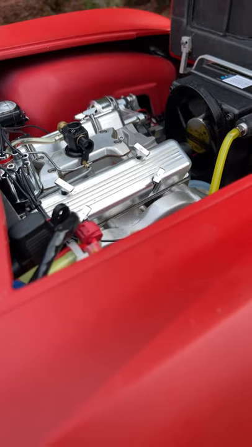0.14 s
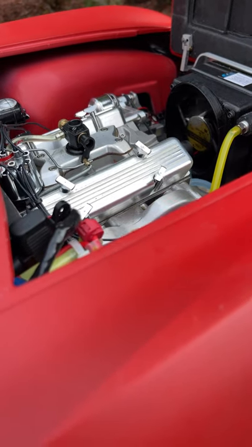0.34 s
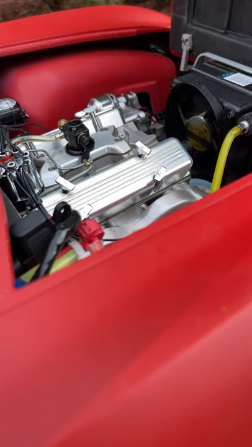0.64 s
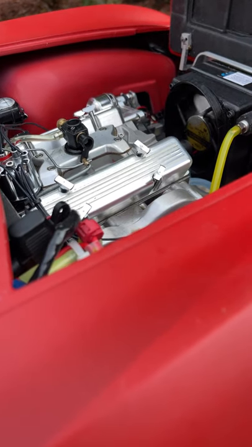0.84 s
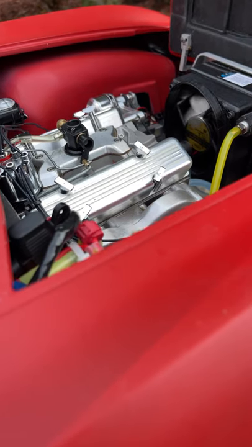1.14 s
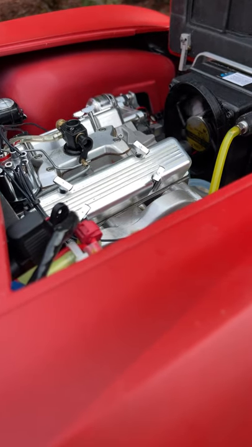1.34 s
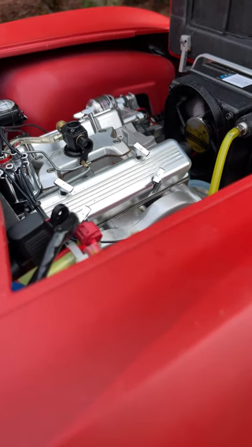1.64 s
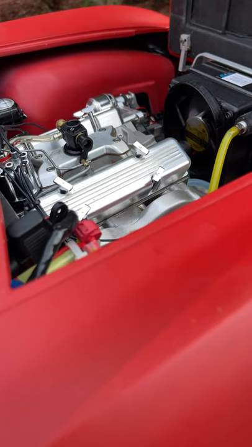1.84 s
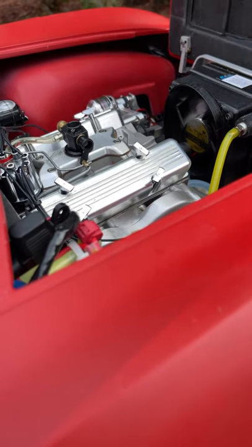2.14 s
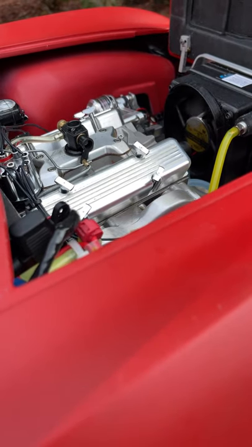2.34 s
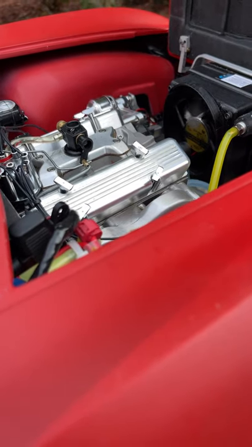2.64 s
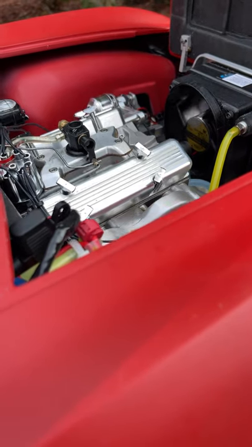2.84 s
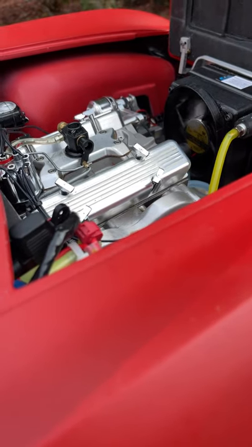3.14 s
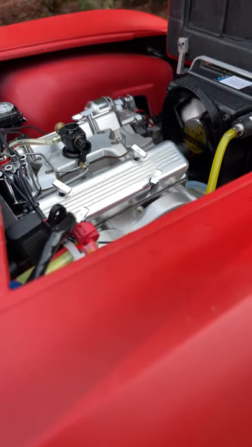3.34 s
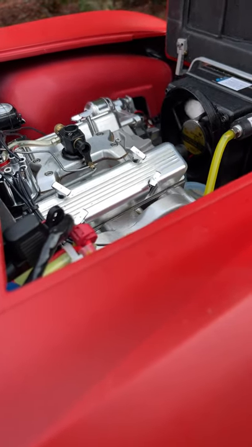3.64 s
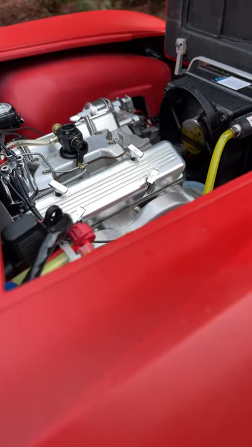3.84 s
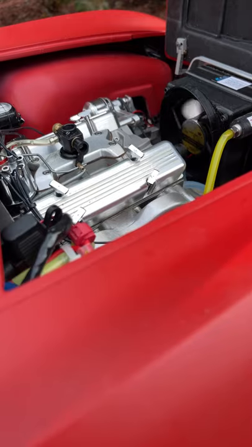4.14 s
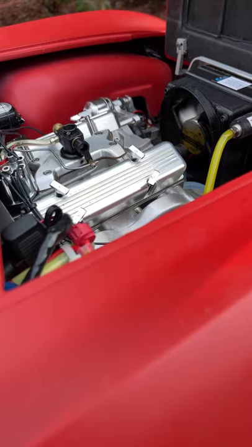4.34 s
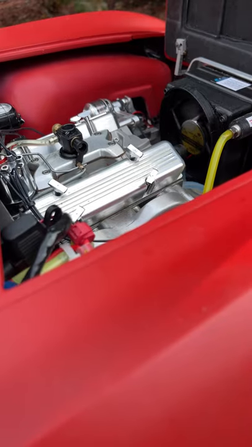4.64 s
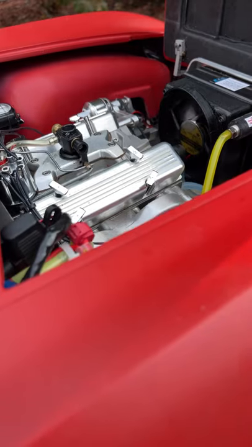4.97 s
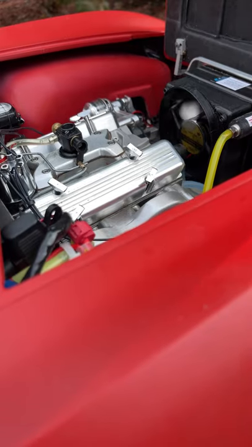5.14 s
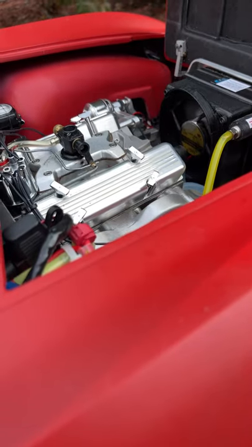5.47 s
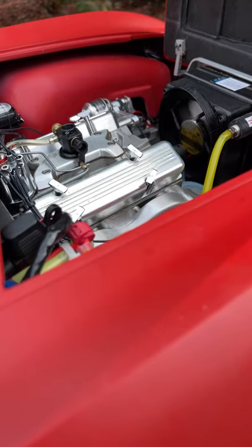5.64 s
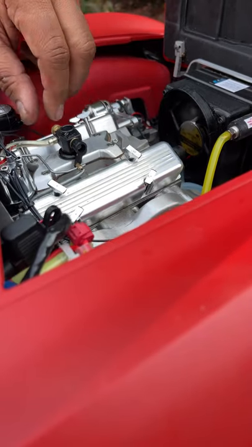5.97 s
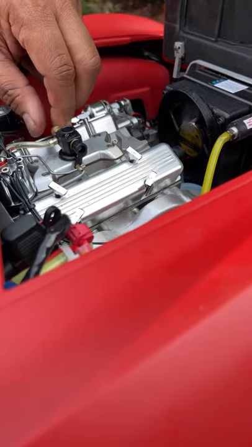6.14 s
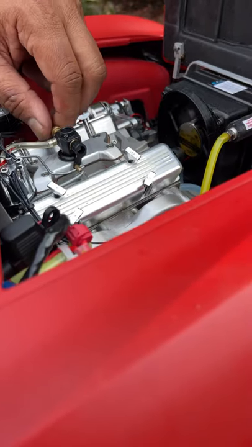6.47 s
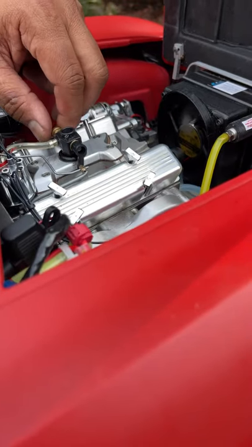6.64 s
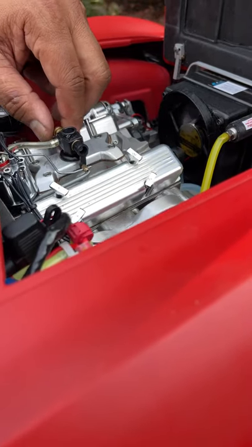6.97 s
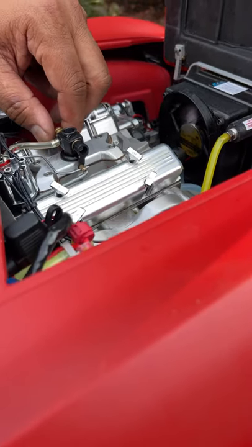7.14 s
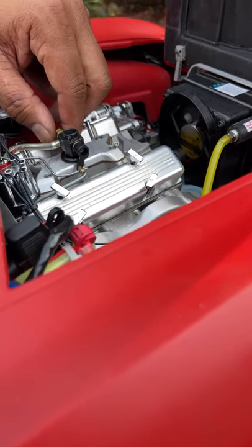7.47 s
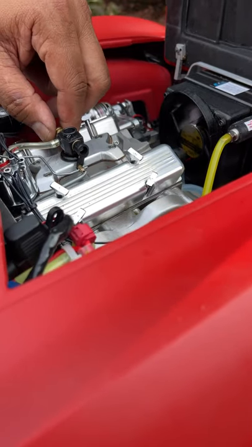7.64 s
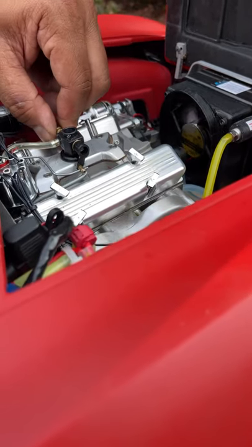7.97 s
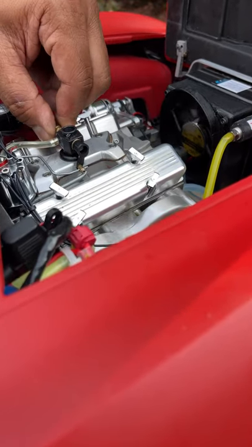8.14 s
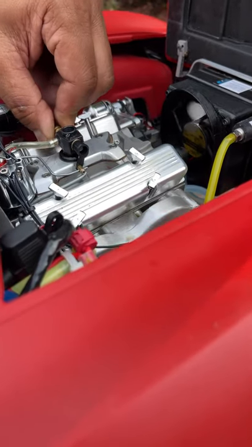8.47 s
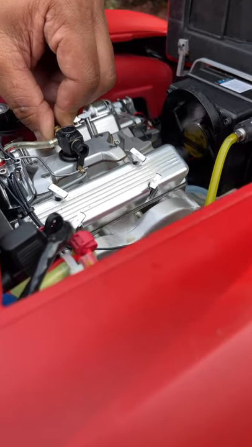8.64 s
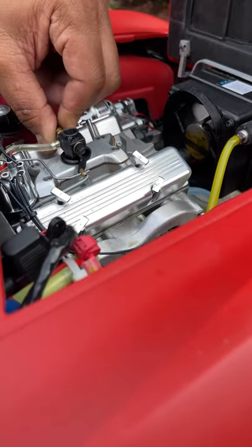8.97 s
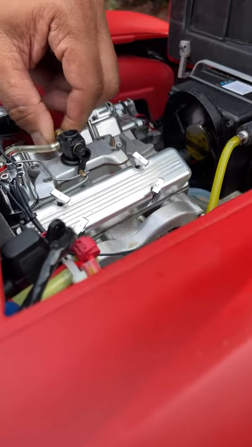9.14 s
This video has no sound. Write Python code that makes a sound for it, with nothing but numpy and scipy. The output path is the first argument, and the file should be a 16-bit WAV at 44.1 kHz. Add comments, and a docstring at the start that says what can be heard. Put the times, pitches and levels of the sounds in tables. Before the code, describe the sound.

Near-silent outdoor air, then a sharp clack and a bright, steady grinding of small starter gears, lasting over two seconds with a faint motor hum. After that come short throbbing bites with rough growls and tooth scrapes, with soft chuffing between. A last rattling bite comes near seven seconds, then only quiet chuffing. Close, dry microphone with dulled top.

```python
"""A starter clacks in, grinds for about two and a half seconds, then bites in short throbbing bursts.
Between bites the engine turns with a soft chuffing and now and then a graze of teeth; it never settles into running.
Place: the open engine bay of a model car with a miniature V8, outdoors. Distance: no loss or echo is added.
Gears, scrapes, clack and air are random noise or impacts filtered by the bay; motor, squeaks and thumps are sines.
The microphone rounds the peaks, has a deep notch in the treble and loses the top."""
import sys
import numpy as np
from scipy import signal
from scipy.fft import rfft, irfft
from scipy.io import wavfile
from scipy.ndimage import uniform_filter1d

SR = 44100
rng = np.random.default_rng(int(sys.argv[2]) if len(sys.argv) > 2 else 0)


def put_to_file(sound):
    """Save the sound as 16-bit audio at rate SR, in the file named by the first command-line argument."""
    columns = np.atleast_2d(sound).T  # one column per channel
    safe = np.clip(columns, -1, 1)
    whole_steps = np.round(safe * 32767)
    wavfile.write(sys.argv[1], SR, whole_steps.astype(np.int16))


N = 410130
TIME = np.arange(N) / SR

# Levels below are before the trims in the functions; spectra are relative, as colour() evens out their power.
# crankshaft, steady at first and then surging and sagging: (time [s], speed [turns/s])
CRANK_SPEED = [(0.0, 16.509), (2.03, 16.509), (2.39, 17.563), (3.07, 14.439), (3.49, 16.112),
               (3.87, 13.446), (4.49, 17.001), (4.73, 14.14), (4.9, 13.43), (5.02, 16.875), (5.4, 18.485),
               (5.87, 12.914), (6.49, 17.154), (7.0, 16.568), (7.3, 17.197), (7.63, 14.144), (8.17, 17.516),
               (9.3, 16.398)]
# faint air of the place: (frequency [Hz], level [dB per Hz])
OUTDOORS_SPECTRUM = [(30, -32), (140, -5), (270, -1.5), (380, -18), (750, -13), (1350, -6.5), (6000, -23),
                     (9000, -52)]
OUTDOORS_DB = -58
# engine bay resonances and hollows: (frequency [Hz], width [Hz], height [dB])
BAY_RESONANCES = [(264, 35, -2), (357.4, 12, -7), (421, 33, 4), (566.4, 35, 5.5), (781, 45, 5.5),
                  (855, 106, -11), (1000, 210, 1.5), (1398, 117, -4.5), (2270, 81, 2), (3054, 79, 4),
                  (4500, 150, -5.5), (5387, 91, 5.5), (7180, 470, 7)]

# the starter clacks in: (time [s], level [dB], decay time [s])
CLACK_HITS = [(0.3868, -12, .0006), (0.388, -21, .005)]
# colour of the clack: (frequency [Hz], level [dB per Hz])
CLACK_SPECTRUM = [(100, -27.5), (1000, -18), (1800, -2), (2800, -7), (3700, 1), (6500, -3), (11000, -24)]

# the starter gears bite; attack and release are the times for 20 dB:
# (time [s], hold [s], rasp level [dB], sag over the hold [dB], attack [s], release [s])
GEAR_BITES = [(0.413, 0.069, -18, 1.5, 0.015, .2), (0.518, 2.285, -15.5, 0.36, 0.059, 0.067),
              (2.835, .01, -16, -0.5, 0.069, 0.066), (2.955, .11, -14, 2, 0.21, 0.21),
              (3.18, .25, -23.5, -5, .2, .11), (3.488, 0.013, -16.3, 1, 0.043, 0.054),
              (3.804, 0.044, -18.5, -0.5, 0.08, 0.095), (4.432, 0.23, -15, 3, 0.049, .055),
              (4.896, 0.13, -15.5, 5, 0.024, 0.027), (5.149, .12, -12.5, 5.5, 0.015, 0.044),
              (5.628, 0.1, -12.5, 10, 0.038, 0.095), (6.88, 0.39, -23, 2.5, .12, 0.065)]
# how deeply the compressions throb the gears: (time [s], depth [dB])
THROB_DEPTH = [(0.5, 0.2), (2.6, 1.3), (3.8, 3), (4.45, 2.5), (4.6, 3.5), (5.2, 4.5), (6.9, 3.5)]
# low clatter of the gear housing: (time [s], level against the rasp [dB])
HOUSING_LEVEL = [(0.5, -9.5), (1.9, -5.5), (2.7, -8), (3.45, -4.5), (4.6, -10.5), (7.0, -11)]
# colours of the bright teeth and the duller housing: (frequency [Hz], level [dB per Hz])
RASP_SPECTRUM = [(500, -24), (1000, -12), (1500, -3.5), (2100, 3), (3200, 1.5), (4500, -2.5), (6500, -7),
                 (7400, -24.5), (9500, -21.5), (11000, -45.5)]
CLATTER_SPECTRUM = [(30, -24.5), (130, -29.5), (175, -17), (230, 1.5), (450, 1), (680, 0.5), (1100, -0.5),
                    (1800, -2.5), (4000, -61)]
# extra resonances: gears ringing at first, straining later, then with a hand over the carburettor:
# (frequency [Hz], width [Hz], height [dB])
RINGING_RESONANCES = [(2070, 64, 6), (2650, 2800, -2), (3450, 380, 0.5), (3880, 160, 4.5), (5200, 150, 3.5)]
STRAINING_RESONANCES = [(440, 690, -2.5), (1060, 1200, 3.5), (6050, 2500, 1.5)]
UNDER_HAND_RESONANCES = [(317, 410, 20.6), (804, 610, 7.8), (1650, 79, 8.9), (3600, 200, 9),
                         (5370, 570, 5.1)]
# faint squeaks all through the grinding: level is against the rasp
SLIPS_PER_S, SLIP_DB, SLIP_SPREAD_DB = 75, -8.5, 1.5
SLIP_LOW_HZ, SLIP_HIGH_HZ, SLIP_HALF_S = 1150, 4194, 0.0059

# free-turning engine: (time [s], chuff level [dB])
CHUFF_LEVEL = [(0.4, -56), (3.55, -38), (4.35, -36.5), (5.1, -43.5), (6.2, -43.5), (7.5, -46), (9.3, -44.2)]
# colour of the pumped air: (frequency [Hz], level [dB per Hz])
AIR_SPECTRUM = [(35, -23), (90, -18), (170, -5), (280, 7), (420, 2), (700, 1), (1200, 2.5), (2000, 2),
                (3100, 2.5), (4500, -2), (6500, -8), (7400, -24), (9500, -22.5), (11000, -44)]
# slipping teeth squeak: (time [s], level [dB], pitch [Hz], half length [s])
TOOTH_SQUEAKS = [(0.422, -18, 4040, 0.0098), (0.454, -14, 3570, 0.0058), (3.756, -19, 2020, 0.0065),
                 (3.777, -15.5, 1690, 0.0064), (4.855, -23, 1920, 0.0038), (5.311, -23.5, 2190, 0.0041),
                 (6.772, -32, 1510, .005), (6.798, -31, 1674, 0.0079), (8.302, -36, 2200, 0.0074),
                 (8.477, -28, 2910, 0.0041), (8.477, -30.5, 1950, 0.004)]
# motor drone during the long bite: (time [s], hum level [dB], rumble level [dB])
DRONE_LEVELS = [(0.44, -40.5, -36.5), (0.8, -38, -36), (1.65, -31.5, -33.5), (1.93, -58, -32.5),
                (2.3, -72, -54)]
DRONE_PER_TURN = 8
# colour of the rumble: (frequency [Hz], level [dB per Hz])
RUMBLE_SPECTRUM = [(55, -63), (95, -5), (135, -2), (280, 17.5), (450, -3), (700, -34.5)]

# teeth catch hard: (time [s], level [dB], half length [s])
HARD_CATCHES = [(0.473, -9, 0.0049), (2.89, -14.5, 0.0099), (3.171, -18.5, 0.0077), (3.788, -10.5, 0.0088),
                (3.82, -12, 0.007), (3.885, -15, 0.0049), (4.048, -29.5, 0.013), (4.427, -11.5, 0.0054),
                (4.855, -26.5, 0.0047), (4.929, -13, 0.0056), (4.963, -14, 0.0035), (5.113, -27.5, 0.0085),
                (5.312, -29, .004), (5.597, -21, 0.008), (5.797, -16.5, 0.0027), (5.807, -23.5, .007),
                (6.087, -25.5, 0.0097), (6.84, -20.5, 0.0038), (6.886, -16, 0.0032), (6.94, -16, 0.0036),
                (6.984, -17, .0025), (7.001, -16.5, 0.0051), (7.064, -17.5, 0.0092), (7.112, -25, 0.0034),
                (7.196, -22, 0.0031)]
# a high tooth grazes once a crank turn for a while: (first time [s], length of the run [s], level [dB])
GRAZE_RUNS = [(4.122, .09, -29.5), (8.239, .09, -35.5), (8.414, .15, -37.5)]
GRAZE_HALF_S = 0.0047
# colour of catches and grazes: (frequency [Hz], level [dB per Hz])
GRAZE_SPECTRUM = [(150, -22), (280, -1.5), (1200, 1), (1800, 6.5), (2400, 5), (3300, 1), (4500, -3.5),
                  (6500, -4.5), (7500, -37), (11000, -34)]

# the motor spins up and sinks in a short bite; the pitch wavers about these values:
# (top time [s], rise [s], fall [s], top pitch [Hz], top level [dB])
GROWL_ARCHES = [(3.085, .065, 0.059, 255.4, -32), (4.56, 0.15, 0.14, 275.5, -29.5),
                (4.975, 0.087, 0.077, 267, -31.5), (5.232, 0.103, 0.075, 292.5, -27.5),
                (5.682, 0.071, 0.077, 283, -24)]
# share of pitch and level lost at either end of the arch
GROWL_SAG, GROWL_SAG_POWER, GROWL_FADE_DB = .19, 1.8, 17.5
# hollow thumps as the engine kicks in the last bite: (time [s], level [dB], pitch [Hz], half length [s])
KICK_THUMPS = [(6.891, -26, 251, 0.0082), (7.020, -26.5, 236, 0.0036), (7.080, -24, 234, 0.0045)]
CUTOFF_HZ = 11000


def from_db(db):
    """Amplitude ratio of a level in dB."""
    return 10 ** (np.asarray(db) / 20)


def rms_one(x):
    """Scale to an rms of 1."""
    return x / np.sqrt(np.mean(x ** 2) + 1e-20)


def in_time(rows):
    """Each column of a curve, sample by sample."""
    s, *columns = np.transpose(rows)
    return [np.interp(TIME, s, c) for c in columns]


def during(rows, fade_s=0.013):
    """1 while a curve lasts, with short fades outside."""
    inside = np.minimum(TIME - rows[0][0], rows[-1][0] - TIME)
    return np.clip(1 + inside / fade_s, 0, 1)


def drift(rate_hz, step=40):
    """Slow random wander of rms 1, drawn every 40 samples and joined by straight lines."""
    r = np.exp(-2 * np.pi * step * rate_hz / SR)
    white = rng.standard_normal(N // step + 2002)
    slow = signal.lfilter([1], [1, -2 * r, r * r], white)[2000:]   # the start-up is dropped
    return np.interp(np.arange(N) / step, np.arange(len(slow)), rms_one(slow))


def colour(x, spectrum, resonances=(), size=8192):
    """Causal filter of unit power gain: a smooth spectrum with peaks and hollows on it."""
    hz = np.maximum(np.arange(size // 2 + 1) * SR / size, 1)
    points_hz, points_db = np.transpose(spectrum)
    db = np.interp(np.log(hz), np.log(points_hz), points_db)
    for centre, width, height in resonances:
        db = db + height / (1 + (2 * (hz - centre) / width) ** 2)
    cepstrum = irfft(np.log(from_db(db)))[:size // 2]
    response = irfft(np.exp(rfft(2 * cepstrum, size)))   # minimum phase: nothing rings early
    return signal.fftconvolve(x, response / np.linalg.norm(response))[:N]


def impacts(per_s, spread_db):
    """Dense random metal contacts of uneven strength; rms 1."""
    strengths = from_db(spread_db * np.clip(rng.standard_normal(N), -2, 2))
    signs = rng.choice([-1, 1], N)
    return rms_one(strengths * signs * (rng.random(N) < per_s / SR))


def swing(turns, per_turn_db):
    """Gain that swings once, twice, three and four times a crank turn; mean power close to 1."""
    db = sum(depth * np.cos(2 * np.pi * (k + 1) * turns) for k, depth in enumerate(per_turn_db))
    gain = from_db(db)
    return gain / np.sqrt(uniform_filter1d(gain ** 2, size=SR // 8))


def swell(s, half_s, rise=0.93, fall=1.1):
    """The samples around a brief contact and its bell envelope there: it builds faster than it fades."""
    near = slice(int((s - .05) * SR), int((s + .05) * SR))
    t = TIME[near] - s
    width = half_s * np.where(t < 0, rise, fall)
    return near, np.exp(-.5 * (t / width) ** 2)


def rings(rows, level_db, waver, sag_per_s):
    """Each contact sets one resonance going, its pitch unsteady and sagging."""
    out, wobble = np.zeros(N), drift(480)
    for s, db, hz, half_s in rows:
        near, shape = swell(s, half_s)
        pitch = hz * (1 + waver * wobble[near] - sag_per_s * (TIME[near] - s))
        phase = 2 * np.pi * np.cumsum(pitch) / SR
        out[near] += from_db(db + level_db) * shape * np.sin(phase)
    return out


def outdoors():
    """Faint steady air of the open place: coloured noise, not filtered by the bay."""
    return from_db(OUTDOORS_DB) * colour(rng.standard_normal(N), OUTDOORS_SPECTRUM)


def clack():
    """The starter pinion hits its stop and bounces: two decaying noise bursts."""
    force = np.zeros(N)
    for s, db, decay_s in CLACK_HITS:
        force += from_db(db) * (TIME >= s) * np.exp(-np.abs(TIME - s) / decay_s)
    return colour(force * rng.standard_normal(N), CLACK_SPECTRUM, BAY_RESONANCES)


def mesh():
    """How firmly the gears are in mesh: each bite sets in, holds while its level shifts and lets go."""
    level = np.zeros(N)
    for s, hold_s, db, sag_db, attack_s, release_s in GEAR_BITES:
        near = slice(int((s - 2 * attack_s) * SR), int((s + hold_s + 2 * release_s) * SR))
        t = TIME[near] - s
        outside = np.maximum(np.maximum(-t / attack_s, (t - hold_s) / release_s), 0)
        bite_db = db - sag_db * np.clip(t / hold_s, 0, 1) - 20 * outside
        level[near] = np.maximum(level[near], from_db(bite_db))
    return level * (TIME > CLACK_HITS[0][0])   # no grinding before the clack


def slips():
    """Teeth slip at random and squeak, each on a pitch of its own; level relative to the rasp."""
    chance = rng.random((int(SLIPS_PER_S * N / SR), 3))
    margin_s = GEAR_BITES[0][0]
    times = margin_s + chance[:, 0] * (TIME[-1] - 2 * margin_s)
    levels = SLIP_DB + SLIP_SPREAD_DB * (2 * chance[:, 1] - 1)
    pitches = SLIP_LOW_HZ * (SLIP_HIGH_HZ / SLIP_LOW_HZ) ** chance[:, 2]
    rows = [(s, db, hz, SLIP_HALF_S) for s, db, hz in zip(times, levels, pitches)]
    return rings(rows, level_db=0, waver=0.021, sag_per_s=0.6)


def gears(turns, snap=0.41, uneven_db=1.0, uneven_share=0.34):
    """The teeth rattle hardest at each of the four compressions per turn, setting in sharply."""
    level = mesh()
    depth, = in_time(THROB_DEPTH)
    housing_db, = in_time(HOUSING_LEVEL)
    load = swing(turns, [0.07 * depth, .5 + 0.069 * depth, 0, depth])
    sharpen_db = -snap * depth * np.sin(16 * np.pi * turns)
    uneven = (uneven_db + uneven_share * depth) * drift(59)
    load = load * from_db(sharpen_db + uneven)
    # the teeth give the bright rasp, the housing a duller clatter that throbs less
    teeth = from_db(-1.7) * level * load * impacts(per_s=5500, spread_db=0.0)
    housing = level * from_db(housing_db) * np.sqrt(load) * impacts(per_s=2500, spread_db=2.5)
    early = np.clip(2.4 - TIME, 0, 1)   # the ringing fades over one second
    hand = TIME > 6.5   # the hand is over the carburettor
    states = [(early, RINGING_RESONANCES), (1 - early - hand, STRAINING_RESONANCES),
              (hand, UNDER_HAND_RESONANCES)]
    grinding = np.zeros(N)
    for share, extra in states:
        resonances = BAY_RESONANCES + extra
        grinding += colour(share * teeth, RASP_SPECTRUM, resonances)
        grinding += colour(share * housing, CLATTER_SPECTRUM, resonances)
    return grinding + level * load * slips()


def chuffing(turns):
    """Pistons pump air and the valve gear ticks, unevenly over each turn."""
    level_db, = in_time(CHUFF_LEVEL)
    strokes = swing(turns, [1.43, 2.26, 0.13, 0.6]) * from_db(0.71 * drift(23))
    air_and_ticks = rms_one(rng.standard_normal(N) + impacts(per_s=1500, spread_db=0.5))
    pumped = from_db(level_db) * during(CHUFF_LEVEL) * strokes * air_and_ticks
    return colour(pumped, AIR_SPECTRUM, BAY_RESONANCES)


def squeaks():
    """Slipping teeth squeak: short sines of wavering, sagging pitch."""
    return rings(TOOTH_SQUEAKS, level_db=2.5, waver=0.082, sag_per_s=0.6)


def drone(turns, rough=0.56, rumble_db=3.5, octave_db=-1.0):
    """Under steady load the motor hums near eight times crank speed, over a low rumble that carries its octave."""
    hum_db, level_db = in_time(DRONE_LEVELS)
    wavering_speed = np.gradient(turns) * (1 + 0.0187 * drift(6.4))
    phase = 2 * np.pi * DRONE_PER_TURN * np.cumsum(wavering_speed)
    hum = from_db(hum_db - 3.5) * np.sin(phase) * (1 + rough * drift(38))
    octave = from_db(octave_db) * np.sin(2 * phase) * (1 + rough * drift(12))
    knocks = swing(turns, [1.2, 1.2]) * impacts(per_s=580, spread_db=2.5)
    rumble = from_db(rumble_db) * colour(knocks, RUMBLE_SPECTRUM, BAY_RESONANCES)
    return during(DRONE_LEVELS) * (hum + from_db(level_db) * (octave + rumble))


def grazes(turns):
    """The contacts of each grazing run, one whole crank turn apart."""
    contacts = []
    for s, length_s, db in GRAZE_RUNS:
        first, last = np.interp([s, s + length_s], TIME, turns)
        times = np.interp(np.arange(first, last), turns, TIME)
        contacts += [(at, db, GRAZE_HALF_S) for at in times]
    return contacts


def catches(turns):
    """Brief scrapes of the teeth, hard catches and light grazes: swells of dense impacts."""
    force = np.zeros(N)
    for s, db, half_s in list(HARD_CATCHES) + grazes(turns):
        near, shape = swell(s, half_s)
        force[near] += from_db(db) * shape
    scrapes = force * impacts(per_s=7000, spread_db=3.5)
    return from_db(-1.0) * colour(scrapes, GRAZE_SPECTRUM, BAY_RESONANCES)


def growl(turns, rough=0.38, sideband_db=-14, level_db=5.0):
    """The labouring motor: a rough tone arching in pitch and level, with a sideband from the compressions above."""
    out, waver = np.zeros(N), 1 + 0.014 * drift(30.3)
    for s, rise_s, fall_s, top_hz, db in GROWL_ARCHES:
        near = slice(int((s - 2 * rise_s) * SR), int((s + 2 * fall_s) * SR))
        t = TIME[near] - s
        away = np.maximum(-t / rise_s, t / fall_s)   # 0 at the top of the arch, 1 at its ends
        pitch = top_hz * (1 - GROWL_SAG * away ** GROWL_SAG_POWER) * waver[near]
        phase = 2 * np.pi * np.cumsum(pitch) / SR
        sideband = from_db(sideband_db) * np.sin(phase + 8 * np.pi * turns[near])
        arch = from_db(db + level_db - GROWL_FADE_DB * away ** 3)
        out[near] += arch * (np.sin(phase) + sideband)
    return out * (1 + rough * drift(53))


def thumps():
    """The engine kicks: short low sines whose pitch wavers and sags."""
    return rings(KICK_THUMPS, level_db=5.5, waver=0.12, sag_per_s=6.2)


def scene():
    """The crank's turning drives starter and engine; the outdoor air lies under both."""
    speed, = in_time(CRANK_SPEED)
    turns = np.cumsum(speed) / SR
    starter = clack() + gears(turns) + squeaks() + drone(turns) + catches(turns) + growl(turns)
    engine = chuffing(turns) + thumps()
    return (outdoors() + starter + engine)[None]


def record(dry, notch_hz=8050, notch_q=7.0):
    """Peaks are rounded, the microphone has a deep notch in the treble, the top is cut."""
    rounded = dry / (1 + (dry / .76) ** 6) ** (1 / 6)
    b, a = signal.iirnotch(notch_hz, notch_q, fs=SR)
    notched = signal.lfilter(b, a, signal.lfilter(b, a, rounded))
    top_cut = signal.ellip(10, .2, 80, CUTOFF_HZ, fs=SR, output="sos")
    return signal.sosfilt(top_cut, notched)


dry = scene()
out = record(dry)
put_to_file(out)
```